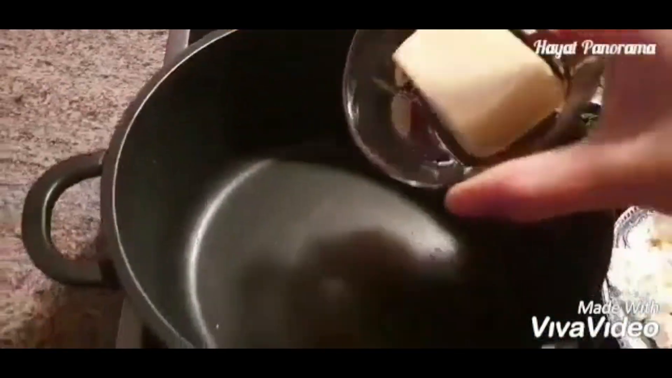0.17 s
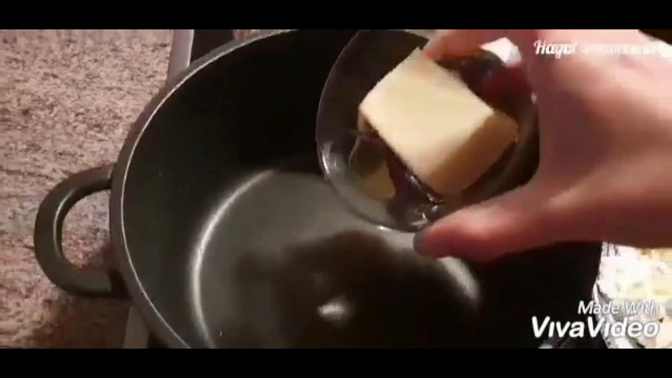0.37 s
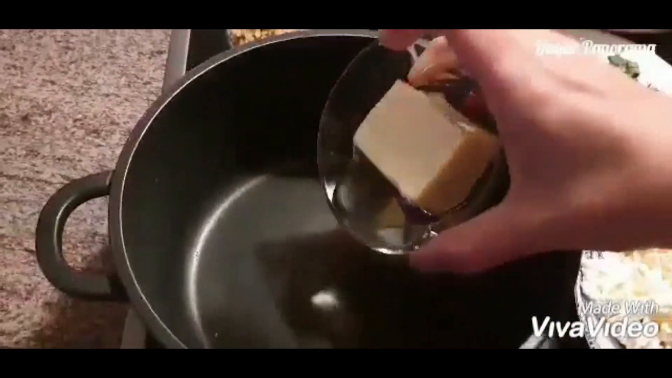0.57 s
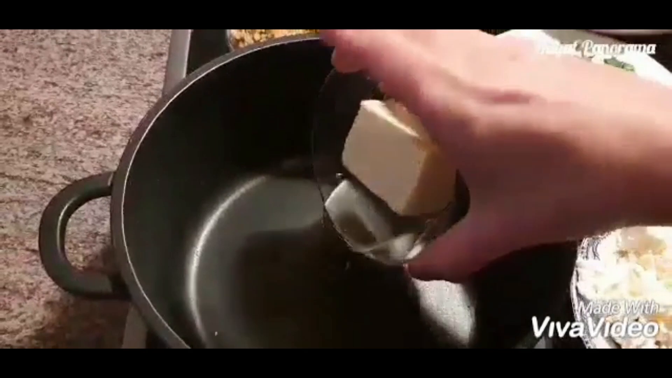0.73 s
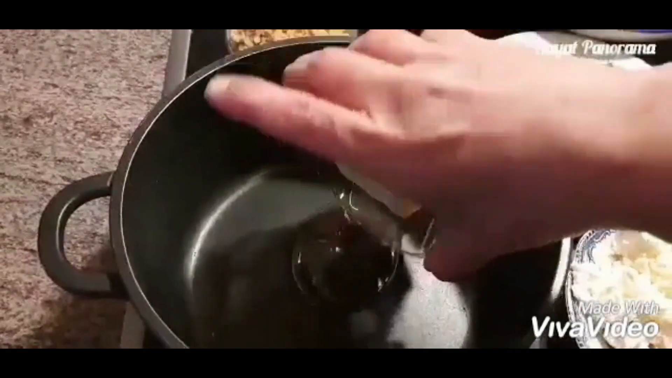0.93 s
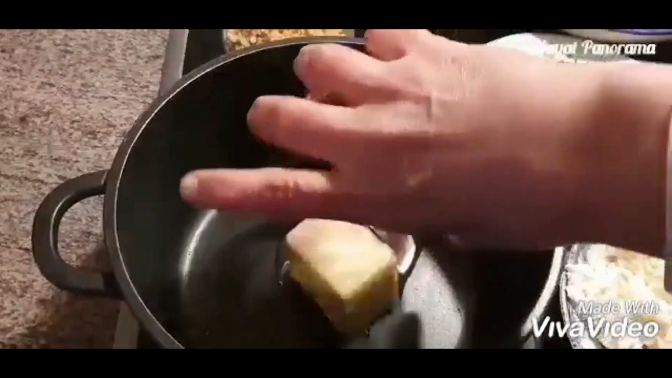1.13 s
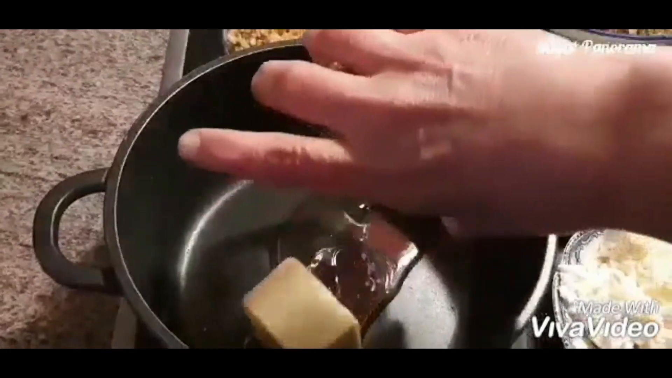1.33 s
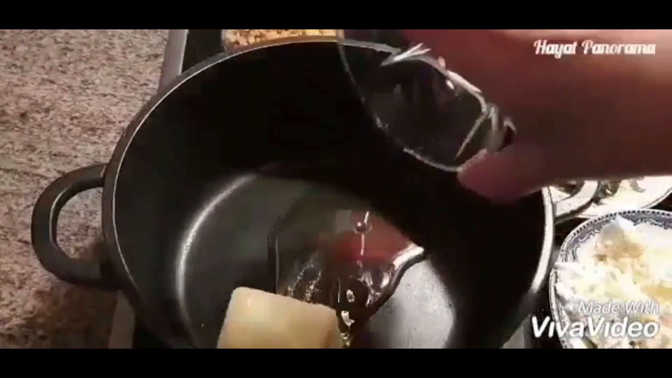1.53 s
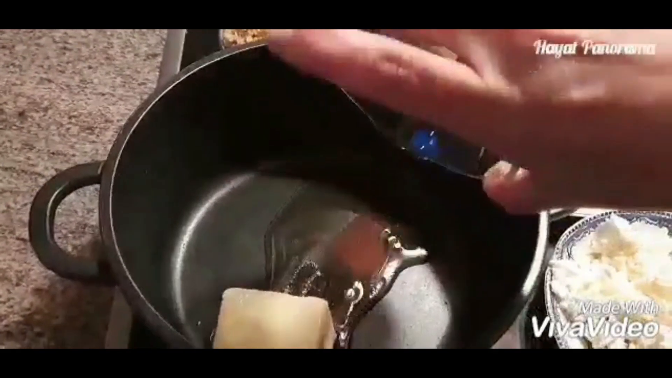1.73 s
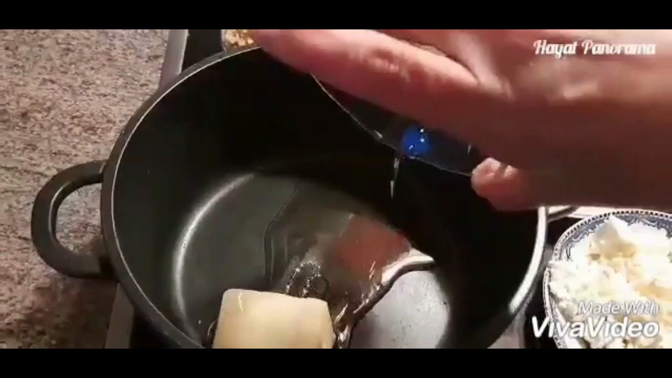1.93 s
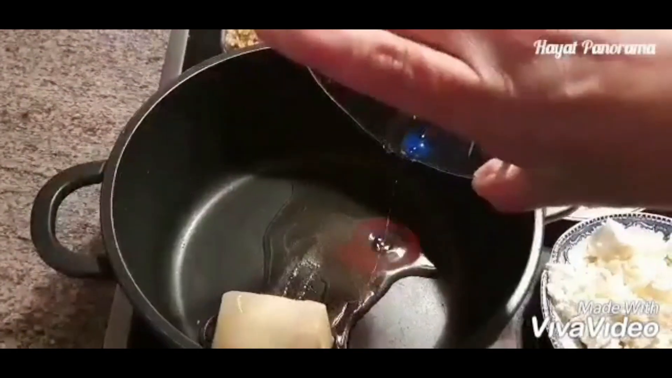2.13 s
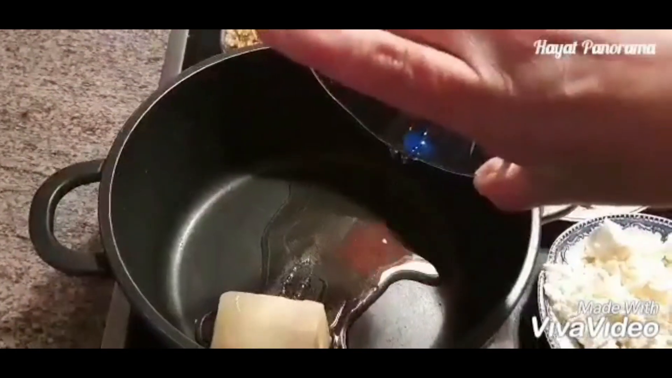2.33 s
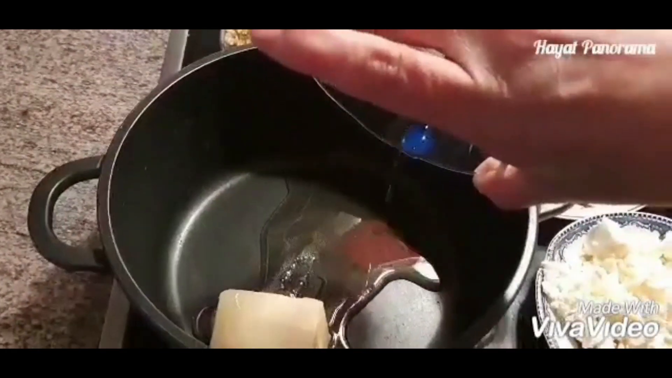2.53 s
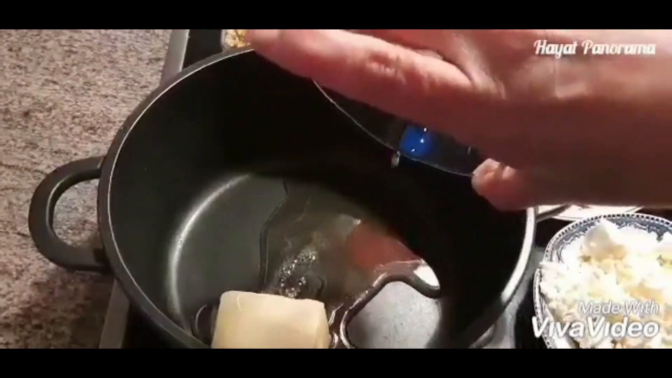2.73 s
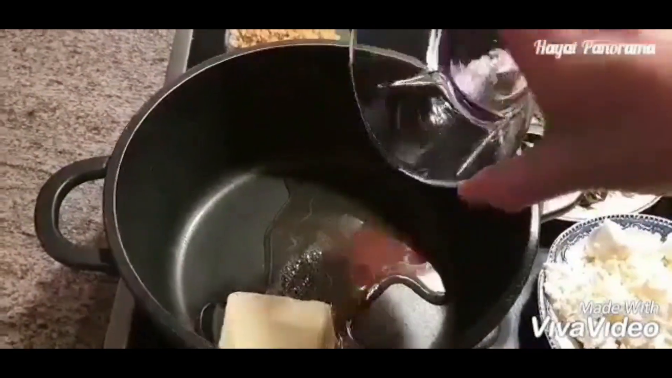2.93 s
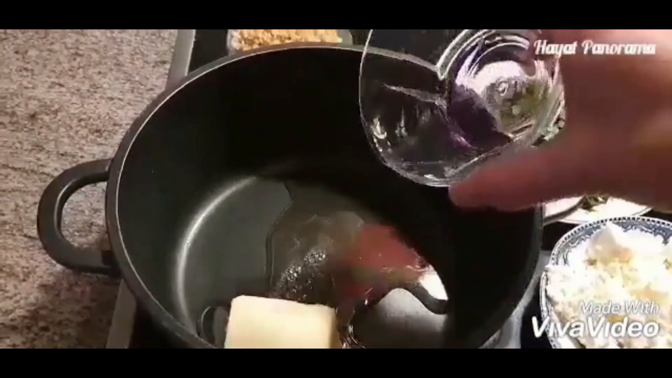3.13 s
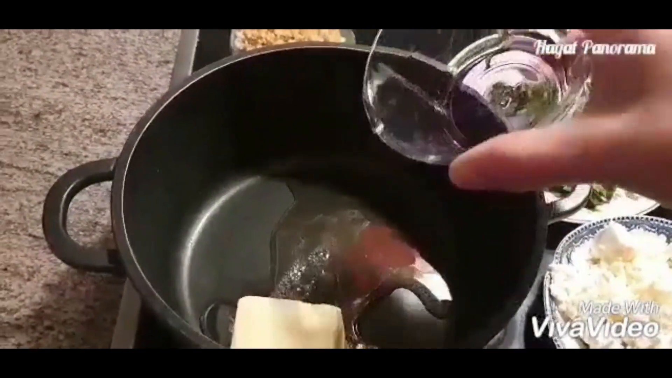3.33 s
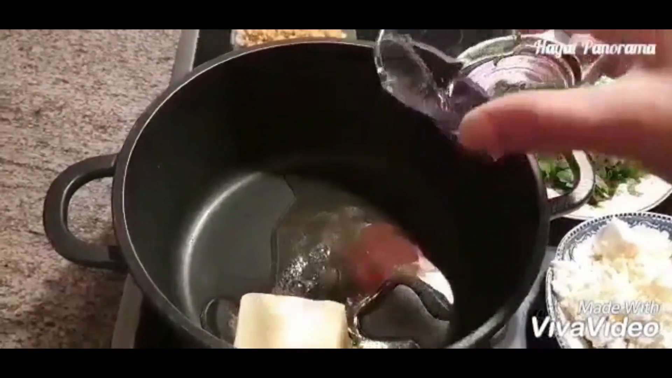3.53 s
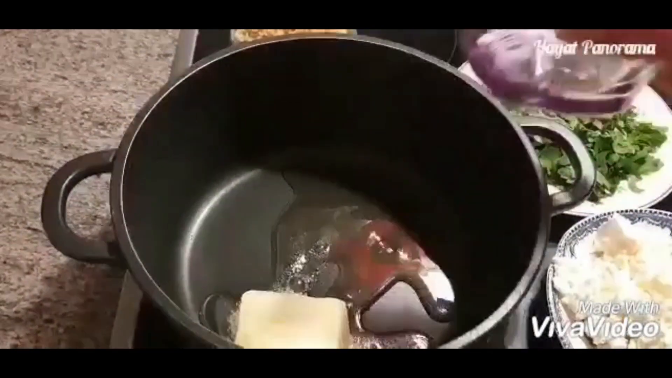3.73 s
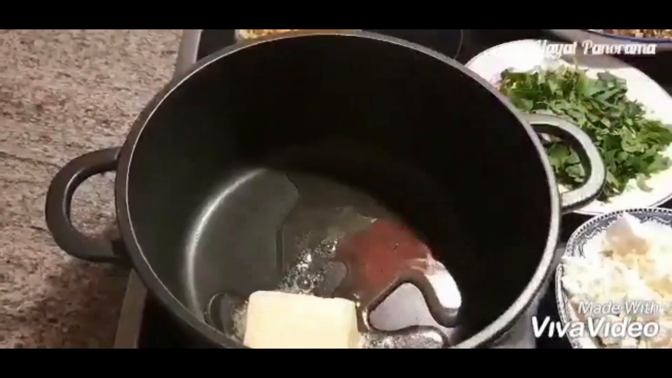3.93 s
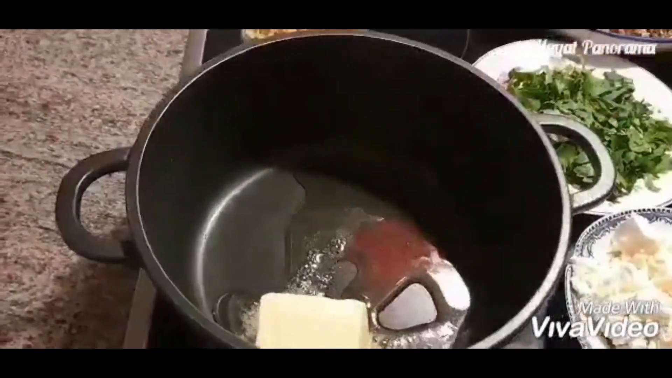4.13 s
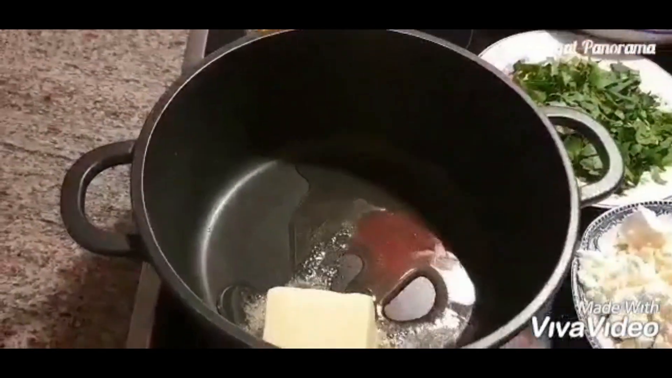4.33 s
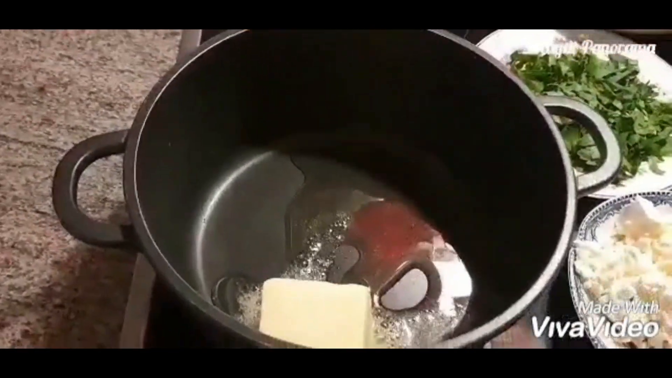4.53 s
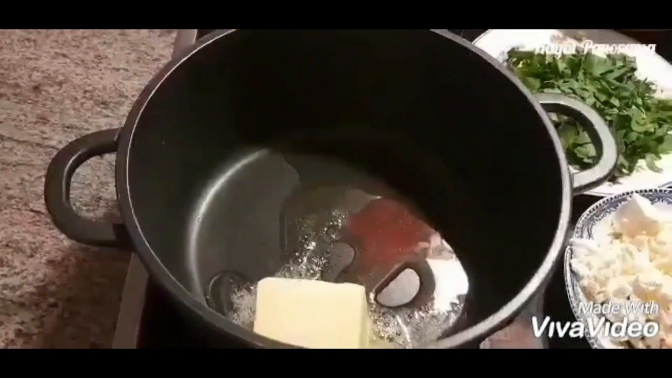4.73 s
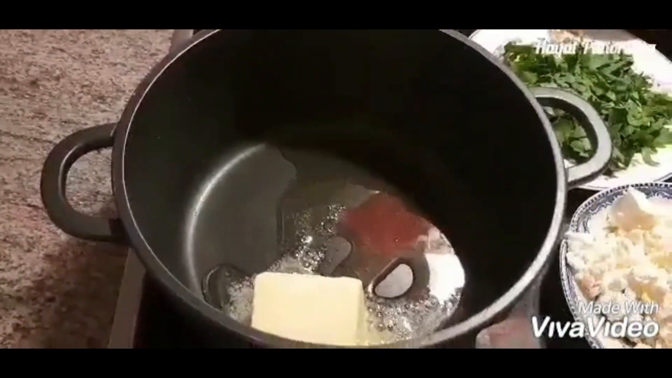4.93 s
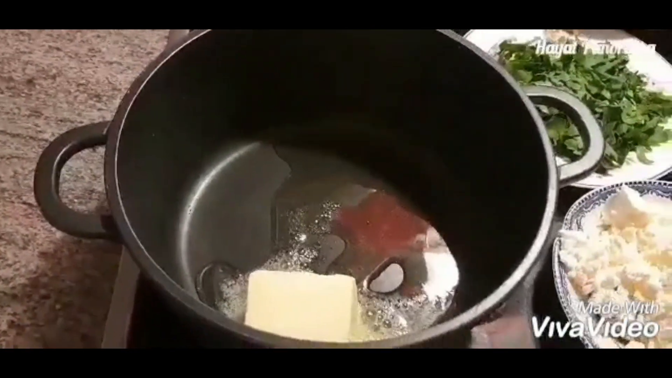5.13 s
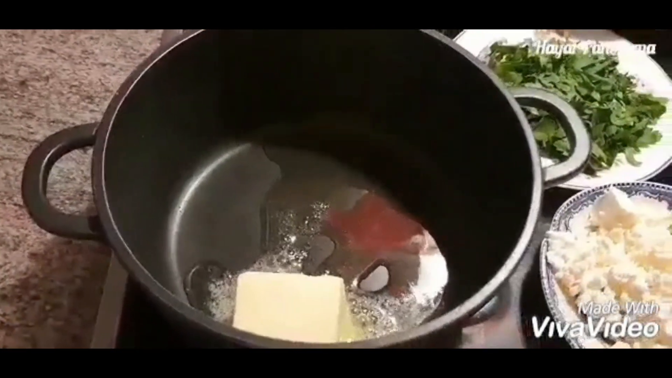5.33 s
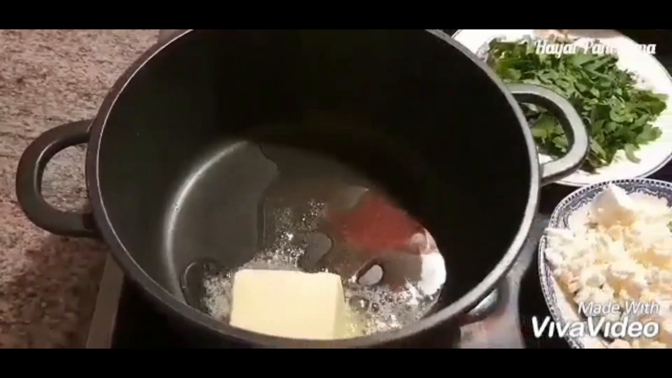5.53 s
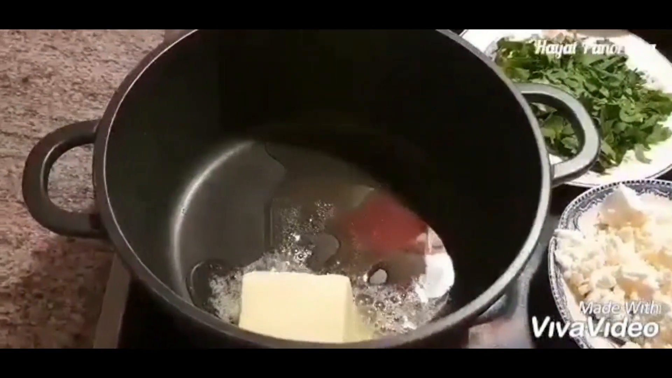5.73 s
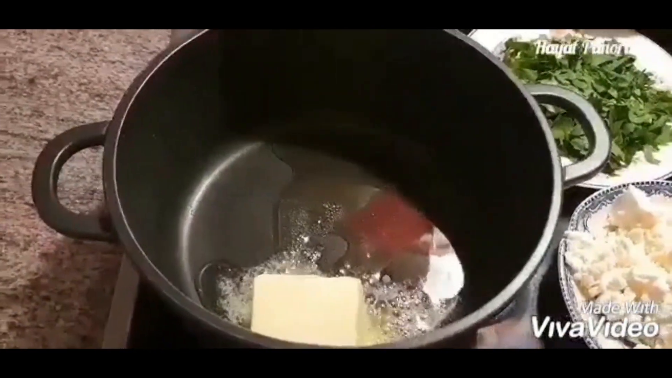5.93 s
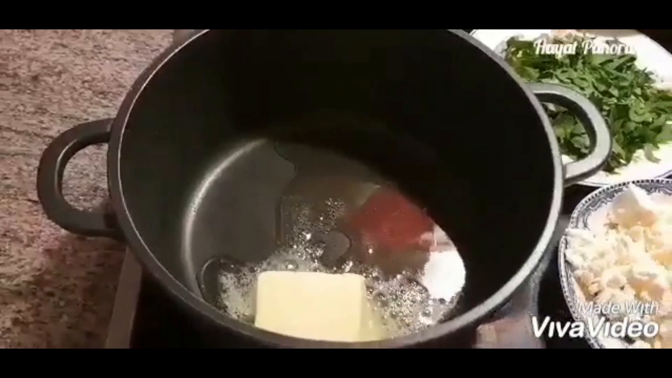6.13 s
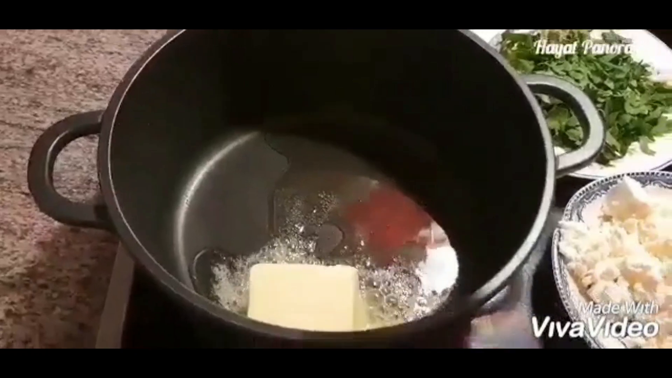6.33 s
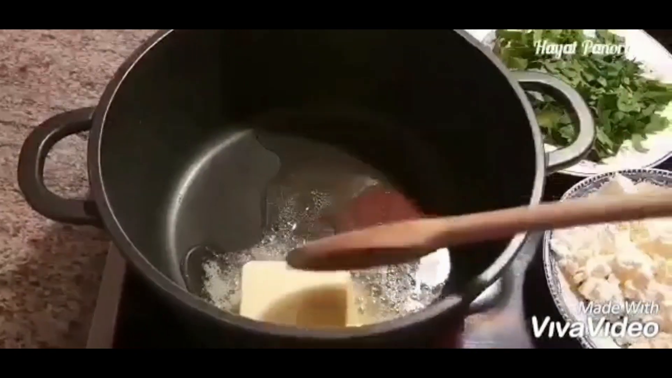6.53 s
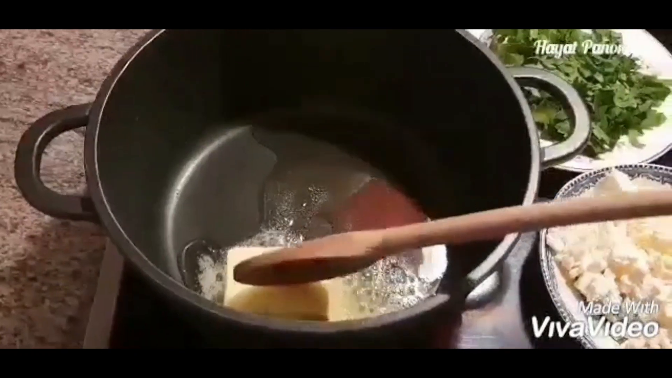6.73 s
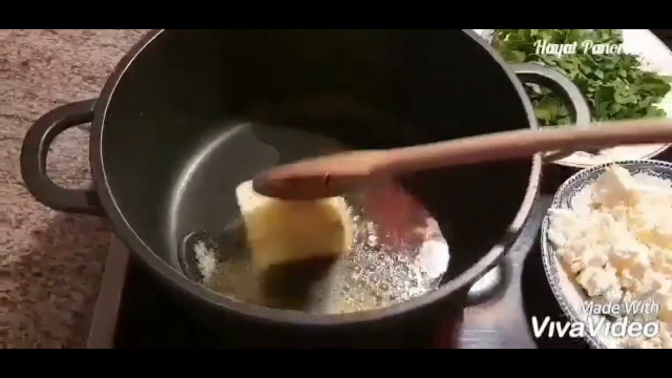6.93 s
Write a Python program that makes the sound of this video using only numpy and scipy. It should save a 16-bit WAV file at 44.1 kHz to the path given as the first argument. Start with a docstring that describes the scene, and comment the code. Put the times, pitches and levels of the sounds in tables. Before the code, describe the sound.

After about a second of near silence with low hum and a glass bowl's slight clink, fat meets a hot metal pot: spitting, a hoarse little squeak, a dull low thump. Dry, bright crackles follow irregularly while frying grows steadily fuller and deeper. Late on, crockery shifts softly and a wooden spoon rattles against the cookware. Close, small kitchen, crackle brighter towards the left, handling slightly right.

```python
"""In a quiet kitchen with mains hum and a faint whine, a hand rustles and a glass bowl rings as it shifts.
Butter and oil then meet a hot pot: wet bubbles spatter, the block skids in filtered noise and thuds on damped modes.
Swarms of bubbles foam ever louder through the pot's resonances, while single drops burst with a tick and a snap.
Dishes are nudged on the worktop, and near the end a wooden spoon judders in a train of stick-slip pulses."""
import sys
import numpy as np
from scipy import signal
from scipy.io import wavfile

SR = 44100
rng = np.random.default_rng(int(sys.argv[2]) if len(sys.argv) > 2 else 0)


def master_out(mix):
    """Clip the mix to full scale and print it as 16-bit PCM to the path in sys.argv[1]."""
    frames = np.transpose(np.atleast_2d(mix))
    ceiling = np.clip(frames, -1, 1)
    pcm = np.round(ceiling * 32767).astype(np.int16)
    wavfile.write(sys.argv[1], SR, pcm)


N = 308259
TIME = np.arange(N) / SR

# mains partials, each moved to the nearest multiple of 50 Hz: f/Hz, nominal level/dB
HUM = [(53.8, -64.5), (102.3, -68)]
# low room noise, spectral density: f/Hz, relative level/dB
ROOM = [(12, -42.5), (20, -15), (38, -7), (59, -3.5), (71, -15.5), (103, -6.5), (161, -26), (295, -24),
        (463, -34), (587, -23), (745, -38.5), (2380, -47.5), (3020, -47), (3350, -47.5), (11000, -49),
        (14300, -83), (22000, -120)]
ROOM_DB = -75.5  # nominal room level between 188 and 7800 Hz
# the hand moves over the pot: t/s, level/dB
RUSTLE = [(0, -71.5), (.15, -71.5), (.25, -80.5), (.4, -100)]
# faint steady whine: f/Hz, level/dB
WHINE = [(3130, -92.5), (5980, -91), (8600, -91.5)]

# the glass bowl shifts in the hand: t/s, contact time/s, thump level/dB, ring level/dB, rub level/dB, brightness f/Hz
BOWL_SHIFTS = [(.880, 0.048, -95, -52.5, -90, 6000)]
# modes of the glass bowl: f/Hz, relative level/dB, t60/s
GLASS = [(433, 6.5, 0.089), (772, 3, 0.1), (1642, -6, 0.12), (1826, -9, .11), (3900, -4.5, 0.12),
         (5400, -14, .08)]
# blows and slides on the pot: t/s, contact time/s, thump level/dB, ring level/dB, rub level/dB, brightness f/Hz
KNOCKS = [(1.661, 0.0031, -19, -73, -44, 600), (1.665, 0.013, -60, -45, -43, 2650),
          (1.677, 0.0053, -62, -35.5, -41, 3420), (1.708, 0.019, -41, -51, -54.5, 1500),
          (1.745, 0.0094, -43, -71, -57, 700), (2.049, 0.045, -80, -85, -62, 308),
          (5.345, 0.027, -44.5, -80, -75, 200), (6.451, 0.0087, -55, -46, -28.5, 5400)]
# modes of the pot's wall and base: f/Hz, relative level/dB, t60/s
POT = [(692, -9, .22), (910, -4.5, 0.18), (1920, -24, 0.11), (2261, -18, 0.19), (2379, -14, 0.17),
       (2640, -15, .11), (2676, -8, 0.12), (2990, -7.5, 0.16), (3060, -11, 0.13), (3600, -18, .14),
       (4020, -11, .07)]
# dishes and spoon nudged on the worktop: t/s, contact time/s, thump level/dB, ring level/dB, rub level/dB,
# brightness f/Hz
NUDGES = [(3.212, 0.035, -82, -57.5, -67, 1000), (4.366, 0.02, -70, -60, -59, 1100),
          (6.09, 0.057, -72, -52, -60, 600), (6.175, 0.033, -64, -46, -64, 600),
          (6.270, 0.085, -67, -52, -48.5, 900), (6.451, 0.0029, -60, -25, -50, 690)]
# modes of the worktop: f/Hz, relative level/dB, t60/s
WORKTOP = [(165, -9.5, 0.14), (250, -12.5, 0.18), (312, -27, 0.11), (431, -4.5, 0.24), (772, 8, 0.16),
           (1190, -14, 0.091), (1610, -6, 0.11), (4000, -4, .08)]
# modes of the stove and counter giving under a push: f/Hz, relative level/dB, t60/s
STOVE = [(57.5, -15, .6), (104.4, 10.5, 0.14), (129.7, 4.5, 0.15), (180, -1, 0.13), (220, -5, 0.12),
         (328.7, -17, 0.33)]
# spectrum of rubbing: f/Hz, relative level/dB
RUB = [(60, -26), (150, -3.5), (450, 5.5), (650, -5.5), (1200, -4.5), (3000, -3), (6000, 0.5), (11000, 2.5)]

# air resonances of the pot: f/Hz, width/Hz, level/dB
HOLLOW = [(1395, 70, -0.5), (2300, 15, 8.5), (2860, 190, -4), (4390, 94, -8), (5650, 1150, -6.5)]
# left channel over right, applied as a cut on the right: f/Hz, level/dB
LEFT_OVER_RIGHT = [(400, 2), (1000, 10), (2000, 11.5), (4000, 12.5), (6500, 17), (8500, 7.5), (11000, 9.5)]
ECHO = rng.standard_normal((2, 3000))  # the pot's own pattern of echoes

# frying: t/s, nominal foam level/dB, nominal fine-fizz level/dB
FRYING = [(1.33, -77, -80), (1.45, -87, -75), (1.98, -67.5, -69), (2.13, -63.5, -59), (3.57, -63.5, -63.5),
          (3.68, -62, -62), (3.92, -57, -101), (4.02, -54, -77), (4.97, -49.5, -56), (5.44, -45.5, -62),
          (5.69, -43.5, -57.5), (6.11, -44, -58.5), (6.41, -43, -49), (6.99, -40, -61)]
# spectrum of the foam: f/Hz, relative level/dB
FOAM = [(130, -40), (310, -21.5), (740, -7), (1020, -19.5), (1500, -5.5), (1900, -5), (2500, -10.5),
        (2960, 4), (3400, -1.5), (4260, 3), (5600, -4.5), (6800, -5), (7600, -11), (11000, -16)]
# spectrum of the fine fizz: f/Hz, relative level/dB
FIZZ = [(500, -15.5), (1200, -19), (2500, -9), (4500, -32), (6800, -4), (7800, -11.5), (9500, -5.5),
        (11000, -7.5)]
FAT_IN_S = 1.28  # the fat meets the hot base
FIRST_PER_S, LAST_PER_S = 650, 1300  # foam bubbles a second, at the start and at the end

# the wet butter touches the hot base and spatters: t/s, nominal peak level/dB, f/Hz
SPATTERS = [(1.2815, -41, 5300), (1.332, -46, 8300), (1.381, -47, 7000), (1.394, -49, 4630),
            (1.403, -35.5, 8400), (1.4481, -31.5, 5660), (1.544, -40, 10200), (1.574, -56, 4140),
            (1.598, -51.5, 4700), (1.980, -31, 7100), (2.032, -33, 5440), (2.084, -37, 5270)]
# steam squeezed out from under the block colours the spatters: f/Hz, gain level/dB
STEAM = [(1500, -7), (3000, -7), (4400, 2.5), (5400, 1), (6400, 0.5), (7700, -2), (8500, 3.5), (9400, 1.5),
         (11000, -10)]
# the loudest drops bursting in the fat: t/s, nominal peak level/dB, f/Hz, snap level/dB against the pitched tick,
# tail level/dB (low when dry, high when it sprays)
POPS = [(1.9327, -45, 4280, -3, 2), (1.9862, -21, 6450, 8, -3), (2.0072, -25.5, 5100, 5, 2),
        (2.0772, -33, 5340, 17, 8), (2.0852, -22.5, 5470, 17, 4), (2.2244, -37.5, 7060, 4, 5),
        (2.249, -34, 5440, 21, 5), (2.2674, -33.5, 6860, -4, -7), (2.2936, -37, 6420, 16, 0),
        (2.362, -32, 6760, 16, 0), (2.424, -32, 6860, 4, -3), (2.5, -22.5, 6940, 16, -1.5),
        (2.5625, -24.5, 9500, 12, 4), (2.664, -34, 7500, -19, -8), (2.6968, -16, 6830, -2, -3),
        (2.716, -29, 6700, 14, -9), (2.7494, -37, 6800, -4, -9), (2.7823, -22.5, 6800, 4.5, -9),
        (2.7952, -34, 6720, 4, -6), (2.8413, -30, 10250, -5, -9), (2.869, -35.5, 9500, -16, -3),
        (2.9934, -28.5, 9600, -1, 0), (3.009, -25.5, 5150, 19, -5), (3.079, -26.5, 5900, 5, -3),
        (3.1077, -20.5, 6450, 1, -6), (3.142, -31, 8440, 2, 6), (3.2583, -30, 7030, -8, -7),
        (3.2765, -35.5, 6760, 9, -8), (3.3077, -37.5, 6100, -15, -17), (3.324, -27, 6860, 4, -3),
        (3.3366, -38, 6980, -11, -6), (3.419, -21.5, 6740, -19, -5), (3.4391, -27.5, 6330, 17, -3),
        (3.6189, -18, 4290, 11, -3), (3.7095, -36, 4550, -1, 11), (3.7207, -21.5, 5400, 2.5, -4),
        (3.8335, -33, 4660, -12, 3), (3.863, -29.5, 6160, -5.5, -8), (3.9305, -26.5, 9850, -1, -3),
        (3.943, -24.5, 4620, -0.5, 2), (3.9855, -29, 4260, -1, 0), (3.9936, -19, 4800, 10, -1),
        (4.0155, -30, 4970, 6, 2), (4.0578, -24.5, 6200, 5, -0.5), (4.0892, -22.5, 9450, -4, -9),
        (4.141, -42, 4460, 2, 0), (4.1913, -26, 3800, -4, -5), (4.2323, -25, 3840, 5, -1),
        (4.3304, -28.5, 4130, -3, -5), (4.376, -27, 3110, 5, -4), (4.4038, -27, 6500, 9, -7),
        (4.4297, -27, 5540, -6, 4), (4.445, -38, 4770, 6, -9), (4.52, -28, 8800, 10, 2),
        (4.533, -30, 5600, 13, 0), (4.57, -27.5, 4340, 3, -1), (4.59, -30, 5270, -2, 8),
        (4.6283, -25, 6570, 3, -1), (4.708, -29.5, 5600, -5, -10), (4.7241, -19.5, 4160, 21, -4),
        (4.737, -23, 4300, 2, -6), (4.758, -12.5, 5900, 18, -5.5), (4.7688, -24.5, 3280, 6, 2),
        (4.85, -18, 2830, 12, -1.5), (4.9457, -25, 7300, 1, -3), (5.0142, -23, 6500, 17, -1),
        (5.048, -17.5, 6800, 3, -5), (5.072, -17.5, 5260, 1, -5), (5.1253, -22, 8950, -21, 1),
        (5.162, -26.5, 4160, -14, 1), (5.1713, -26, 4400, -4, -19), (5.2042, -17, 6100, -6, -1),
        (5.2429, -23.5, 4440, 1, 0), (5.258, -25, 4370, -5, -6), (5.298, -25, 5200, -12, 1),
        (5.3411, -21.5, 4380, 12, -11), (5.4204, -30.5, 3060, 2, -3), (5.5491, -19, 8900, 5, 1),
        (5.6344, -24.5, 2900, 11, -4), (5.6466, -18.5, 3050, 1.5, -6), (5.7738, -29, 9050, -10, -8),
        (5.8145, -28.5, 7000, -2, 0), (5.827, -23, 3430, -3, 0), (5.84, -27.5, 5550, -16, -7),
        (6.018, -29, 3010, -6, -9), (6.0918, -23, 4380, 4, -13), (6.1215, -22.5, 6300, -17, 1.5),
        (6.1488, -26.5, 5840, -17, -11), (6.2314, -22, 3200, 8, -1), (6.4155, -35, 2370, -1, -7),
        (6.437, -27, 5500, -2, -9), (6.4857, -16, 4680, -8, 0), (6.5475, -30, 4550, -11, -4),
        (6.7499, -21.5, 3430, 17, -1), (6.7817, -26.5, 3200, -2, -5), (6.8427, -28, 2890, -13, 7),
        (6.938, -25, 5170, -10, -1)]
SPATTER_STIR_DB, POP_STIR_DB = -31.5, -37.5  # fizz stirred up by a burst, against its nominal peak
STIR_S = 0.028  # decay constant of this fizz

# the butter skids before it lands against the wall: t/s, length/s, level/dB
SCUFFS = [(1.574, 0.019, -69), (1.589, 0.033, -67.5)]
# bands of the squeak: f/Hz, width/Hz, relative level/dB
SCUFF_TONE = [(1660, 230, -10), (2240, 340, -3), (3880, 200, -14), (4640, 260, -17)]

SPIT_FROM_S, SPITS_PER_S = 2.0, 19  # lesser drops burst at random once the oil has spread
SPIT_DB, SPIT_RISE_DB_PER_S, SPIT_SPREAD_DB = -41.5, 2.5, 1.5  # their nominal peak grows with the heat
SPIT_HZ, SPIT_FALL_OCT_PER_S, SPIT_SPREAD_OCT = 8230, 0.192, 0.31  # their pitch sinks as the bubbles grow
EDGE_HZ = 11120  # highest pitch of these drops, and the edge of the final low-pass

# the wooden spoon is dragged off its rest: t/s, length/s, slip rate/Hz, push level/dB, wood level/dB,
# scrape level/dB, brightness f/Hz, level change over the length/dB (wood and scrape)
JUDDERS = [(6.306, 0.025, 153, -40.5, -33.5, -42.5, 900, 3.5),
           (6.453, 0.056, 113, -35.5, -34, -33, 5000, -17)]
# modes of the spoon's wood: f/Hz, relative level/dB, t60/s
SPOON = [(292, 1.5, 0.042), (463, 2.5, 0.041), (694, -3.5, 0.058), (1190, -10, .03), (1600, -18, .04),
         (2090, -16, .03)]


def amp(db):
    """Definition of level: the amplitude ratio is ten to the power of dB / 20."""
    return 10 ** (np.asarray(db) / 20)


def unit(x):
    """Normalisation by the root mean square, to rms 1."""
    return x / np.sqrt(np.mean(x ** 2) + 1e-20)


def read(points, hz):
    """Linear interpolation of a spectrum on a logarithmic frequency axis."""
    f, value = np.transpose(points)
    return np.interp(np.log(hz + 1), np.log(f), value)


def add(mix, s, sound):
    """Superposition: a stereo sound is added to the mix from time s."""
    part = mix[:, max(round(s * SR), 0):][:, :sound.shape[1]]
    part += sound[:, :part.shape[1]]


def colour(x, points, size=4096):
    """Minimum-phase filtering: the Hilbert transform of the log gain gives a causal response."""
    hz = abs(np.fft.fftfreq(size, 1 / SR))
    log_gain = np.log(amp(np.maximum(read(points, hz), -100)))
    spectrum = np.exp(np.conj(signal.hilbert(log_gain)))
    taps = np.fft.ifft(spectrum).real[:size // 2]
    return signal.oaconvolve(x, taps[None], axes=1)[:, :x.shape[1]]


def noise_pair(count, apart):
    """Partial coherence: shared white noise plus a side part of size apart, opposite in the two channels."""
    same, side = rng.standard_normal((2, count))
    return np.array([same + apart * side, same - apart * side])


def band_unit(x, lo, hi):
    """Band-level normalisation: the channel mean has rms 1 between lo and hi."""
    band = signal.butter(4, [lo, hi], "band", fs=SR, output="sos")
    return x / signal.sosfilt(band, x.mean(0)).std()


def wander(per_s):
    """Random modulation: a piecewise-linear curve of rms 1 through per_s random points a second."""
    s = np.arange(0, TIME[-1] + 1, 1 / per_s)
    return unit(np.interp(TIME, s, rng.standard_normal(1000)[:len(s)]))


def ring(modes, t):
    """Modal superposition: the sum of exponentially dying modes after one tap."""
    return sum(amp(db - 60 * t / t60) * np.cos(2 * np.pi * hz * t) for hz, db, t60 in modes)


def reverberate(sound, room_db, room_t60):
    """Reverberation: convolution with exponentially decaying noise adds the room's tail."""
    count = sound.shape[1]
    t = np.arange(count) / SR
    tail = unit(rng.standard_normal((2, count)) * amp(-60 * t / room_t60)) / np.sqrt(count)
    return sound + amp(room_db) * signal.fftconvolve(sound, tail, axes=1)[:, :count]


def kitchen(hum_db=-1, room_db=0):
    """Stationary background: wavering mains partials, low room noise and a faint rustle of the hand."""
    hum = 0
    for hz, db in HUM:
        waver_db = np.interp(TIME, np.linspace(0, TIME[-1], 50), rng.standard_normal(50))
        mains_hz = 50 * round(hz / 50)
        tone = np.sin(2 * np.pi * (mains_hz * TIME + rng.random()))
        hum = hum + np.sqrt(2) * amp(db + hum_db + 1.0 * waver_db) * tone
    room = amp(ROOM_DB + room_db) * band_unit(colour(noise_pair(N, apart=0.53), ROOM), 188, 7800)
    rustle_tone = [(500, -19), (1800, -10.5), (3200, -5.5), (6000, -12.0), (10000, -17.5)]
    rustle = unit(colour(noise_pair(N, apart=1.0), rustle_tone))
    swell = amp(np.interp(TIME, [1.2, 2.2, 6.5], [-2, 1, 3]))
    return (hum + room) * swell + rustle * amp(np.interp(TIME, *np.transpose(RUSTLE)))


def whine(width_hz=70):
    """Narrow-band noise: sharp resonances leave thin, fuzzy steady tones."""
    noise = noise_pair(N, apart=1.0)
    return sum(amp(db) * unit(signal.lfilter(*signal.iirpeak(hz, hz / width_hz, SR), noise))
               for hz, db in WHINE)


def knocks(blows, modes, rub_t60, first_touch, room_db, room_t60,
           push_s=0.00834, lag_s=0.000334, count=20000):
    """Contact excitation: a soft push thumps the counter; rough contact rings the body and rubs, brighter if hard."""
    out, t = np.zeros((2, N)), np.arange(count) / SR
    for s, length, thump_db, ring_db, rub_db, bright_hz in blows:
        thump = -ring(STOVE, t) * np.clip(t / push_s, 0, 1) ** 2
        contact = np.clip(2 * t / length, 0, 1) * amp(-60 * np.maximum(t - length, 0) / rub_t60)
        soften = signal.butter(2, min(bright_hz, SR / 3), fs=SR)
        same, side = rng.standard_normal((2, count))
        # mainly the treble differs between microphones
        side = signal.lfilter(*signal.butter(2, 700, "high", fs=SR), side)
        grit = np.array([same + side, same - side])
        force = unit(grit * contact ** 3) / np.sqrt(count)
        force[:, round(length / 2 * SR)] += first_touch  # one firm touch within the rough contact
        soft_force = signal.lfilter(*soften, force)
        body = signal.fftconvolve(soft_force, ring(modes, t)[None], axes=1)[:, :count]
        rub = unit(colour(signal.lfilter(*soften, grit), RUB)) * contact
        sound = amp(ring_db) * body / abs(body).max() + amp(rub_db) * rub
        # the contact is on the right, so it reaches the left later
        sound[0] = np.interp(t - lag_s, t, sound[0])
        sound = reverberate(sound, room_db, room_t60)
        add(out, s, sound + amp(thump_db) * thump / abs(thump).max())
    return out


def bubble(hz, cycles):
    """Damped oscillation: a bursting bubble swells and dies within a few cycles, of energy 1."""
    turns = hz * np.arange(1024) / SR
    wave = turns * np.exp(-turns / cycles) * np.sin(2 * np.pi * turns)
    return wave / np.linalg.norm(wave)


def path(wall_db=-3, wall_s=0.0065, room_db=-12, room_t60=0.084, right_wet_db=3, count=6000):
    """Impulse response from a spot in the pot to both microphones: direct sound, wall echoes, kitchen tail."""
    t = np.arange(count) / SR
    walls = rng.standard_normal((2, count)) * (rng.random((2, count)) < .15)  # sparse echoes
    walls = walls * np.exp(-t / wall_s) * (t > .0007)
    room = rng.standard_normal((2, count)) * amp(-60 * t / room_t60) * (t > .006)
    wet = (amp(wall_db) * unit(walls) + amp(room_db) * unit(room)) / np.sqrt(count)
    taps = wet * amp([[0], [right_wet_db]])
    taps[0, 0] = taps[1, 3] = 1  # direct sound, three samples later on the right
    return taps


def in_pot(x, echo_db=-7, echo_t60=0.18, count=3000):
    """Cavity resonance: few strong and many weak modes ring along; the right microphone is shaded in the treble."""
    echo = unit(ECHO * amp(-60 * np.arange(count) / SR / echo_t60))
    echo = amp(echo_db) * echo / np.sqrt(count)
    out = x + signal.oaconvolve(x, echo, axes=1)[:, :x.shape[1]]
    for hz, width, db in HOLLOW:
        out += amp(db) * signal.lfilter(*signal.iirpeak(hz, hz / width, SR), x)
    shade = [(hz, -db) for hz, db in LEFT_OVER_RIGHT]
    return np.vstack([out[:1], colour(out[1:], shade)])


def crackle(per_s, spread_db, largest, cycles, snap_db, count=48):
    """Random point process: many small and a few large bubbles, each a wide snap with a high ping."""
    size = amp(spread_db * np.minimum(rng.exponential(1, N), largest)) * rng.choice([-1, 1], N)
    size *= (rng.random(N) < per_s / SR) / np.sqrt(per_s)
    spot, out = rng.integers(0, count, N), np.zeros((2, N))
    for k, hz in enumerate(np.linspace(2400, 11300, count)):
        burst = bubble(hz, cycles * np.exp(rng.uniform(-1.36, 1)) * hz / 5000)
        burst[0] += amp(snap_db)
        grain = signal.fftconvolve(burst[None], path(), axes=1)
        out += signal.oaconvolve((size * (spot == k))[None], grain, axes=1)[:, :N]
    return out


def stirring(bursts, stir_db):
    """Exponential relaxation: gain of the extra fizz that flares up after each loud burst and settles."""
    power = np.zeros(N)
    for s, db, *_ in bursts:
        power += amp(db + stir_db) ** 2 * (TIME > s) * np.exp(-2 * abs(TIME - s) / STIR_S)
    return np.sqrt(power)


def frying(foam_db=0.38, fizz_db=-2, small_hz=4000, grown_s=2.87, foam_surge_db=1, fizz_surge_db=0.5,
           deep_hz=1500, deep_db=-1, deep_surge_db=3.0):
    """Boiling noise: water leaves the butter in surges; bubbles crowd and grow, so the foam deepens."""
    s, foam_level, fizz_level = np.transpose(FRYING)
    per_s = np.geomspace(FIRST_PER_S, LAST_PER_S, N)
    started = np.clip((TIME - FAT_IN_S) / .004, 0, 1)
    foam = crackle(per_s, spread_db=7.0, largest=2.44, cycles=1.06, snap_db=-2.0)
    fizz = crackle(per_s * .5, spread_db=4.0, largest=2.6, cycles=0.62, snap_db=-0.5)

    foam = in_pot(colour(foam, FOAM))
    small = signal.lfilter(*signal.butter(1, small_hz, "high", fs=SR), foam)
    grown = np.interp(TIME, [2.4, grown_s], [0, 1])  # crossfade from small bubbles to the full foam
    foam = grown * band_unit(foam, 2000, 6000) + (1 - grown) * band_unit(small, 2000, 6000)
    fizz = band_unit(in_pot(colour(fizz, FIZZ)), 7000, 11000)

    foam_gain = amp(foam_db + np.interp(TIME, s, foam_level) + foam_surge_db * wander(per_s=12))
    fizz_gain = amp(fizz_db + np.interp(TIME, s, fizz_level) + fizz_surge_db * wander(per_s=10))
    # the largest bubbles come in clusters
    deep = signal.lfilter(*signal.butter(2, deep_hz, fs=SR), foam)
    foam = foam + deep * (amp(deep_surge_db * wander(per_s=25) + deep_db) - 1)
    stirred = np.hypot(stirring(SPATTERS, SPATTER_STIR_DB), stirring(POPS, POP_STIR_DB))
    return started * (foam * foam_gain + fizz * np.hypot(fizz_gain, stirred))


def drop(db, hz, snap_db, spray_db, spray_s, tail_db=0, low_share=0.082, crest_db=9,
         cycles=2.07, snap_s=0.0011, count=2500):
    """Impulsive source: a drop bursts with a pitched tick and a wide snap, then throws a spray of tiny ones."""
    t = np.arange(count) / SR
    snap = rng.standard_normal(count) * t * np.exp(-2 * t / snap_s)
    spray = rng.standard_normal(count) * (rng.random(count) < 2500 / SR)  # 2500 tiny drops a second
    spray = spray * t * np.exp(-2 * t / spray_s)
    burst = (amp(snap_db) * unit(snap) + amp(spray_db + tail_db) * unit(spray)) / np.sqrt(count)
    burst = colour(burst[None], [(200, -11.5), (1000, -23.0), (1800, -12.5), (2800, -0.5),
                                 (7000, 3.5), (11000, -0.5), (14000, 3.0)])
    # small drops carry no bass
    burst = signal.lfilter(*signal.butter(2, min(low_share * hz, SR / 4), "high", fs=SR), burst)
    tick = bubble(hz, cycles)
    burst[0, :len(tick)] += tick
    to_mics = path(wall_db=tail_db, wall_s=0.0035, room_db=tail_db - 9.5, right_wet_db=3.0)
    sound = in_pot(signal.fftconvolve(burst, to_mics, axes=1), echo_db=-16.5)
    attack = sound.mean(0)[:round(.003 * SR)]  # its rms, plus crest_db, stands for the peak
    return amp(db - crest_db) * sound / attack.std()


def pops():
    """Single vapour bursts: wet and long where the butter lands, dry and short in the oil."""
    wet, dry = np.zeros((2, 2, N))
    for s, db, hz in SPATTERS:
        add(wet, s, drop(db, hz, snap_db=3.5, spray_db=-1.5, spray_s=0.031,
                         low_share=0.75, crest_db=10, snap_s=0.0042))
    for s, db, hz, snap_db, tail_db in POPS:
        add(dry, s, drop(db, hz, snap_db, spray_db=-15, spray_s=0.0054, tail_db=tail_db))
    return colour(wet, STEAM) + dry


def scuffs():
    """Sliding friction: the butter skids on the base in short, hoarse squeaks of band-passed noise."""
    out = np.zeros((2, N))
    for s, length, db in SCUFFS:
        count = round(length * SR)
        grit = noise_pair(count, apart=0.82)
        squeak = 0
        for hz, width, level in SCUFF_TONE:
            band = signal.butter(2, [hz - width / 2, hz + width / 2], "band", fs=SR, output="sos")
            squeak = squeak + amp(level) * signal.sosfilt(band, grit)
        add(out, s, amp(db) * unit(squeak * signal.windows.tukey(count)))
    return out


def spits(count=140):
    """Random bursts: lesser drops at irregular moments, on the whole louder and lower as the fat heats up."""
    out = np.zeros((2, N))
    ages = (np.arange(count) + 2 * rng.random(count)) / SPITS_PER_S
    for age, (strength, pitch) in zip(ages, rng.standard_normal((count, 2))):
        octaves = SPIT_SPREAD_OCT * pitch - SPIT_FALL_OCT_PER_S * age
        hz = min(SPIT_HZ * 2 ** octaves, EDGE_HZ)
        db = SPIT_DB + SPIT_RISE_DB_PER_S * age + SPIT_SPREAD_DB * strength
        add(out, SPIT_FROM_S + age, drop(db, hz, snap_db=2.5, spray_db=-33, spray_s=0.0069, tail_db=0.5))
    return out


def judders(push_s=0.0056, push_fade_db_per_s=-90, scrape_s=0.0086, uneven_db=2, late_s=0.00033,
            lag_s=0.000343, room_db=-20, room_t60=0.58, count=14000):
    """Stick-slip friction: each slip of the spoon pushes the counter, knocks the wood and scrapes briefly."""
    out, t = np.zeros((2, N)), np.arange(count) / SR
    for s, length, per_s, push_db, wood_db, scrape_db, bright_hz, fade_db in JUDDERS:
        late, strength = rng.standard_normal((2, 16))
        at = np.arange(0, length, 1 / per_s)[:16]
        moments = abs(at + late_s * late[:len(at)])
        slips = np.zeros(count)
        slips[np.round(moments * SR).astype(int)] = amp(uneven_db * strength[:len(at)])
        fading = slips * amp(fade_db * np.minimum(t / length, 1))

        push_slips = slips * amp(push_fade_db_per_s * np.minimum(t, length))
        pulse = np.sin(np.pi * np.minimum(t / push_s, 1)) ** 2
        push = signal.fftconvolve(push_slips, pulse)[:count]
        push = signal.lfilter(*signal.butter(2, 65, "high", fs=SR), push)
        wood = signal.fftconvolve(fading, ring(SPOON, t))[:count]
        grit = colour(noise_pair(count, apart=.8),
                      [(150, -7), (500, -9), (1200, -1), (3000, 0), (6000, -6), (11000, -15)])
        scrape = signal.lfilter(*signal.butter(2, min(bright_hz, SR / 3), fs=SR), grit)
        scrape *= signal.fftconvolve(fading, np.exp(-t / scrape_s))[:count]

        sound = amp(push_db) * unit(push) + amp(wood_db) * unit(wood) + amp(scrape_db) * unit(scrape)
        sound = sound * np.sqrt(length / t[-1])  # levels refer to the length of the judder
        # the spoon is on the right, so it reaches the left later
        sound[0] = np.interp(t - lag_s, t, sound[0])
        add(out, s, reverberate(sound, room_db, room_t60))
    return out


def scene():
    """Linear superposition of all sources at the two microphones."""
    background = kitchen() + whine()
    bowl = knocks(BOWL_SHIFTS, GLASS, rub_t60=.06, first_touch=0, room_db=-14, room_t60=.3)
    fat = frying() + pops() + scuffs() + spits()
    pot = knocks(KNOCKS, POT, rub_t60=.075, first_touch=1.6, room_db=-20, room_t60=.35)
    worktop = knocks(NUDGES, WORKTOP, rub_t60=.045, first_touch=1.8, room_db=-18, room_t60=.3)
    return background + bowl + fat + pot + worktop + judders()


def record(dry, leak_db=-47):
    """Linear-phase filtering: a steep low-pass, with the whole sound added far more faintly up to about 15.5 kHz."""
    edge = signal.firwin(201, EDGE_HZ, window=("kaiser", 7), fs=SR)
    kept = signal.oaconvolve(dry, edge[None], "same")
    top = signal.firwin(101, 15500, fs=SR)
    return signal.oaconvolve(kept + amp(leak_db) * dry, top[None], "same")


dry = scene()
out = record(dry)
master_out(out)
```